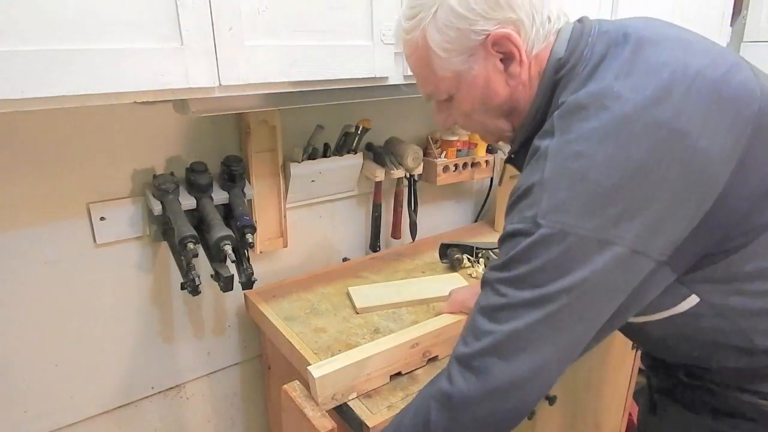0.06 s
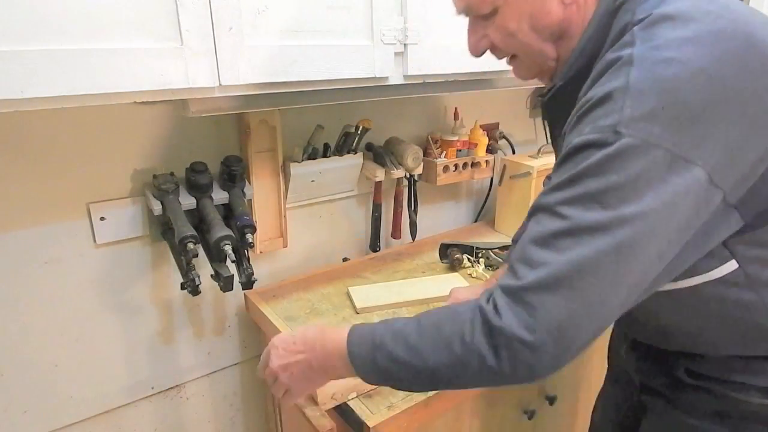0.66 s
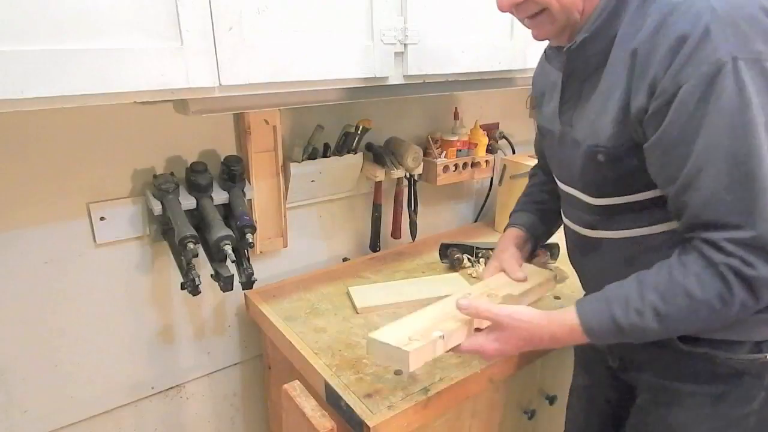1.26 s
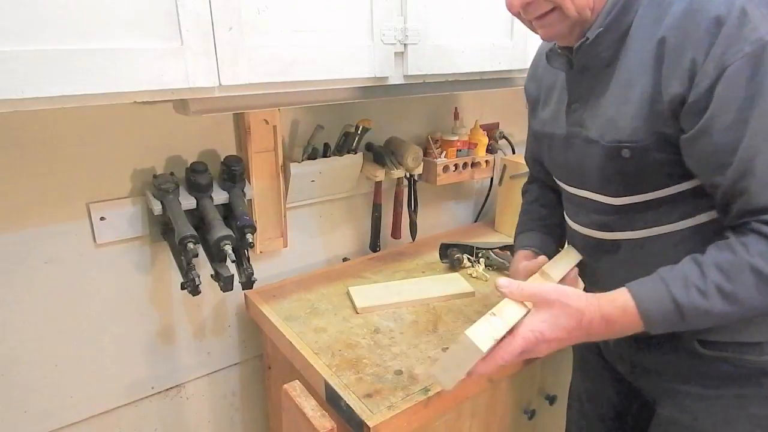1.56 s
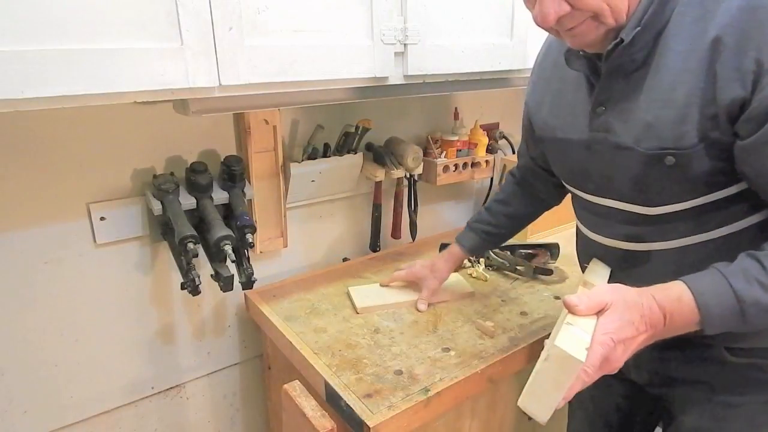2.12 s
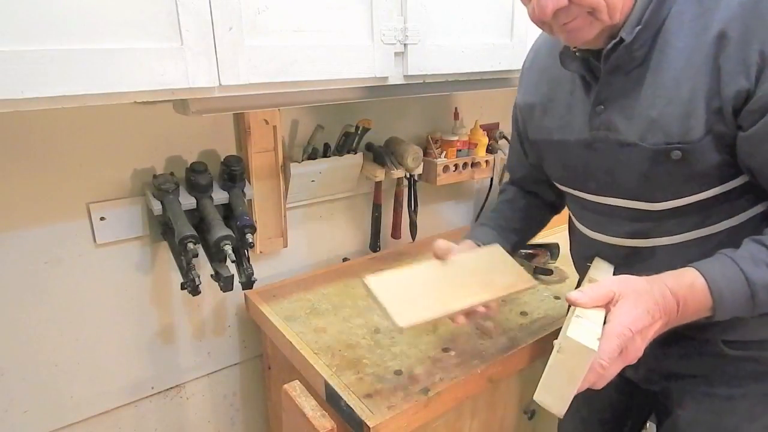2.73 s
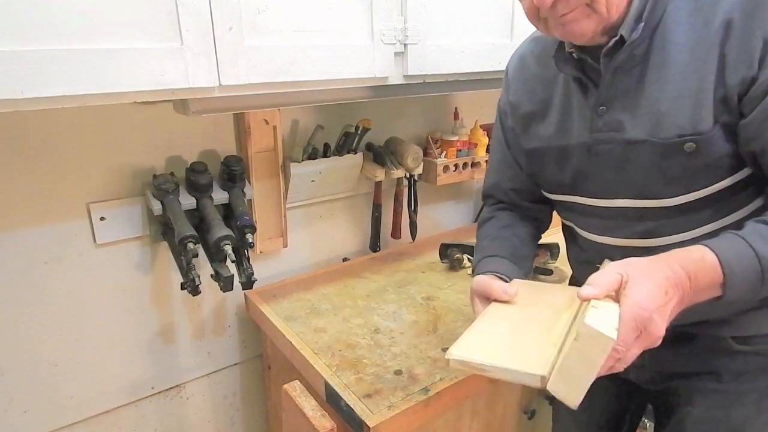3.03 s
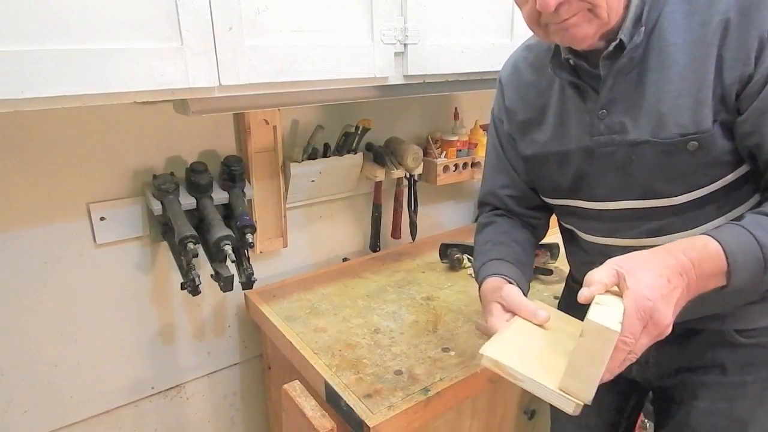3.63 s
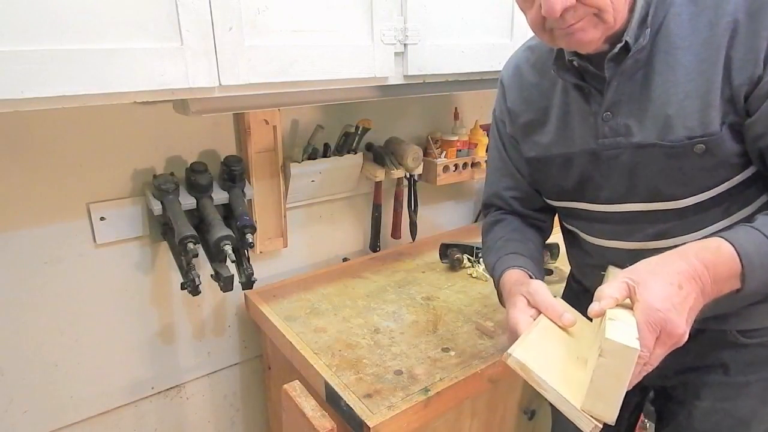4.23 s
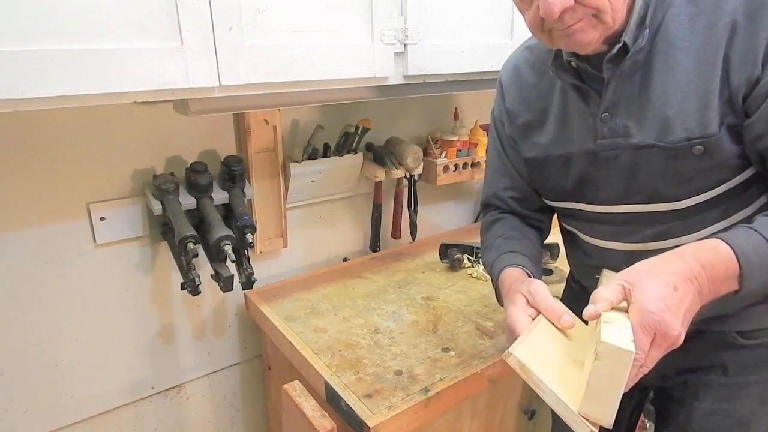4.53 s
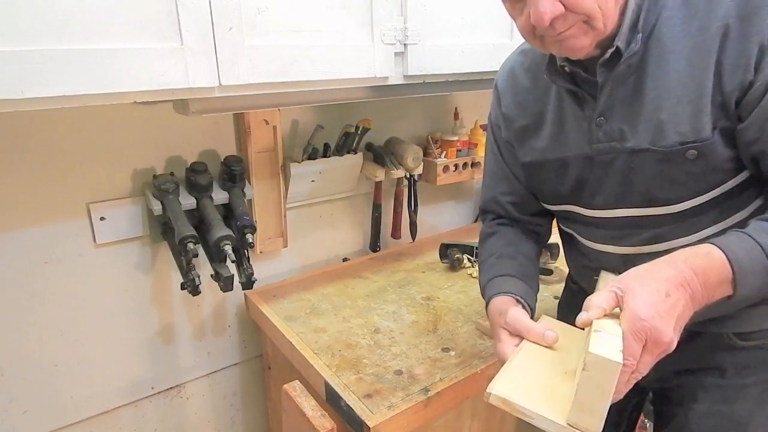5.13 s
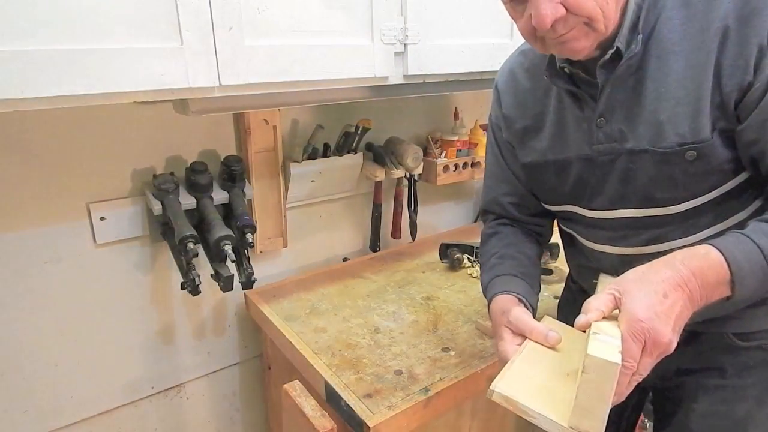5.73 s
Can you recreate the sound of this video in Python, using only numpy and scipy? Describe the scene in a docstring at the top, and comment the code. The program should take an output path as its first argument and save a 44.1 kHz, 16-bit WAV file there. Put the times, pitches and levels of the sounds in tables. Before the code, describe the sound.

In a small workshop, a bench vise is loosened: its screw rumbles while the wooden jaw bumps and groans, and the steel handle gives a bright ringing clink. After a lull, a thin board slides softly off the bench. It is then knocked twice against a hand-held wooden block, about a second apart. Sleeves rustle faintly over a low electrical hum, heard from nearby with a short room echo.

```python
"""A thin board is set against a wooden block and knocked on it four times, two of them loud, ringing both hand-
damped pieces. Before that, the block is freed from a bench vise: the screw rumbles, the jaw knocks and groans,
steel clinks and sings, and the board slides off the bench. Sleeves and hands rustle throughout. A faint mains
hum and the air of a small workshop lie underneath."""
import sys
import numpy as np
from scipy import signal
from scipy.fft import rfft, irfft, next_fast_len
from scipy.io import wavfile
from scipy.ndimage import uniform_filter1d

SR = 44100
rng = np.random.default_rng(int(sys.argv[2]) if len(sys.argv) > 2 else 0)


def generate_wav(signal):
    """Clip the signal to [-1, 1] and save it as 16-bit WAV at the path in sys.argv[1]."""
    frames = np.transpose(np.atleast_2d(signal))
    scaled = np.clip(frames, -1, 1) * 32767
    pcm = np.round(scaled).astype(np.int16)
    wavfile.write(sys.argv[1], SR, pcm)


N = 258867
TIME = np.arange(N) / SR


def from_db(db):
    """Decibels to gain."""
    return 10 ** (np.asarray(db) / 20)


def unit_rms(x):
    """Scale to unit rms."""
    return x / np.sqrt(np.mean(x ** 2) + 1e-20)


def at_hz(curve, hz):
    """Read a curve on a log-frequency axis."""
    freqs, values = np.transpose(curve)
    return np.interp(np.log(np.maximum(hz, 1)), np.log(freqs), values)


def equalise(x, curve):
    """Colour a sound with an EQ curve of (freq_hz, gain_db)."""
    size = next_fast_len(x.shape[-1])
    gain = from_db(at_hz(curve, np.fft.rfftfreq(size, 1 / SR)))
    return irfft(rfft(x, size) * gain, size)[..., :x.shape[-1]]


def low_pass(x, hz):
    """Two-pole low-pass."""
    return signal.sosfilt(signal.butter(2, min(hz, .45 * SR), fs=SR, output="sos"), x)


def resonate(force, modes):
    """Drive parallel resonators of (freq_hz, width_hz, gain_db)."""
    out = 0
    for hz, width_hz, db in modes:
        radius = np.exp(-np.pi * width_hz / SR)
        feedback = [1, -2 * radius * np.cos(2 * np.pi * hz / SR), radius ** 2]
        ring = signal.lfilter([1, 0, -1], feedback, force + 1e-18)
        out = out + from_db(db) * (1 - radius ** 2) / 2 * ring
    return out


def flutter(rate_hz, depth_db):
    """A gain that wanders at random."""
    steps = rng.standard_normal(N)
    return from_db(depth_db * np.interp(TIME * rate_hz, np.arange(N), steps))


def strokes(rows):
    """Envelope of hand strokes: each gathers speed, peaks and runs out ever faster."""
    range_db, fall_curve = 20, 1.67
    t, power = TIME[::32], 0
    for peak_s, db, rise_s, fall_s in rows:
        away = np.where(t < peak_s, ((t - peak_s) / rise_s) ** 2, abs((t - peak_s) / fall_s) ** fall_curve)
        power = power + from_db(db - range_db * np.minimum(away, 10)) ** 2
    return np.interp(TIME, t, np.sqrt(power))


def contact(bright_hz, rattle_s, rattle_db):
    """Force of one touch: a push, then a dying burst of tiny slips; soft touches are dull."""
    t = TIME[:SR // 2]
    slips = rng.standard_normal(len(t)) * np.exp(-t / rattle_s)
    force = from_db(rattle_db) * slips / np.linalg.norm(slips)
    force[0] += 1
    return low_pass(force + 1e-18, bright_hz)


def place(track, start_s, level_db, sound):
    """Lay a sound into a track, with its loudest 20 ms at the given level."""
    at = round(start_s * SR)
    loudest = np.sqrt(uniform_filter1d(sound ** 2, SR // 50, mode="constant").max())
    track[at:at + len(sound)] += (from_db(level_db) / loudest * sound)[:N - at]


# Stereo width of the room: freq_hz, side_over_mid_db
STEREO_WIDTH = [(100, -11), (700, -12), (1300, -8.5), (2500, 0), (5000, -1), (9000, 0.5), (15000, -0.5)]
def diffuse(size):
    """White noise from all around: alike in both channels in the bass, unrelated in the treble."""
    mid, side = rng.standard_normal((2, size))
    mid = equalise(mid, [(hz, -10 * np.log10(1 + from_db(db) ** 2)) for hz, db in STEREO_WIDTH])
    side = equalise(side, [(hz, -10 * np.log10(1 + from_db(-db) ** 2)) for hz, db in STEREO_WIDTH])
    return np.array([mid + side, mid - side])


# Reverb time of the workshop: freq_hz, t60_s
ROOM_DECAY = [(100, 0.38), (400, 0.7143), (1000, 0.73), (2000, 0.78), (5000, 0.5543), (12000, 0.4356)]
def room_tail():
    """Diffuse echo that builds up quickly and dies octave by octave."""
    t, spectrum = TIME[:SR], rfft(diffuse(SR))
    octave = np.log2(np.clip(np.arange(spectrum.shape[1]), 2 ** 6, 2 ** 14))
    tail = 0
    for k in range(6, 15):
        band = irfft(spectrum * np.maximum(1 - abs(octave - k), 0))
        tail = tail + band * from_db(-60 * t / at_hz(ROOM_DECAY, 2 ** k))
    build_up = 1 - np.exp(-t / .0047)
    return unit_rms(tail * build_up) / np.sqrt(SR)


# Early reflections off bench and wall: delay_s, gain_db
EARLY_ECHOES = [(.0032, -13), (.00487, -4), (.0073, -6), (.00914, -11), (.0125, -15)]
def in_room(x, tail, direct_db, room_db, lag_s):
    """Direct sound and early reflections, slightly later on the left, plus the reverb tail."""
    near = x + sum(from_db(db) * np.interp(TIME - s, TIME, x, left=0) for s, db in EARLY_ECHOES)
    pair = np.array([np.interp(TIME - lag_s, TIME, near), near])
    reverb = signal.fftconvolve(x[None], tail, axes=1)[:, :N]
    return from_db(direct_db) * pair + from_db(room_db) * reverb


# Dips in the room tone: start_s, depth_db, hold_s
TONE_DIPS = [(1.325, 12.5, 1.0), (4.25, 8, 0.21)]
def dips(recovery_db_per_s=21.5):
    """Gain that drops at once, holds, and climbs back at a steady rate."""
    db = 0
    for start_s, depth_db, hold_s in TONE_DIPS:
        regained_db = recovery_db_per_s * np.maximum(TIME - start_s - hold_s, 0)
        db = db - (TIME > start_s) * np.maximum(depth_db - regained_db, 0)
    return from_db(uniform_filter1d(db, size=SR // 50))


# Mains hum partials: harmonic, level_db
HUM_PARTIALS = [(1, -65.5), (2, -72.5), (3, -59.5), (4, -60.5), (5, -68.5), (6, -71), (8, -70), (10, -72.5)]
# Dark colour of the room air: freq_hz, gain_db
AIR_EQ = [(12, -6), (30, -3.5), (70, 0), (150, -3), (300, -8), (600, -11.5), (1200, -13.5), (2500, -24.5),
          (6000, -34.5), (15000, -46.5)]
def room_tone(hum_hz=120, air_db=-53.5):
    """A bed of air noise and wavering mains hum that sinks twice and swells back."""
    hum = sum(np.sqrt(2) * from_db(db) * np.sin(2 * np.pi * (hum_hz * harmonic * TIME + rng.random()))
              for harmonic, db in HUM_PARTIALS)
    air = from_db(air_db) * unit_rms(equalise(diffuse(N), AIR_EQ))
    return (air + hum * flutter(rate_hz=3.5, depth_db=2)) * dips()


# Bright colour of rubbed cloth: freq_hz, gain_db
CLOTH_EQ = [(800, -24.5), (1800, -1), (2500, -4), (3000, -3.5), (4100, -2.5), (5200, -9), (8000, -7),
            (11500, -3.5), (13500, -9.5), (15500, -27)]
# Long sweeps and quick flicks of the arms: peak_s, level_db, rise_s, fall_s
SLEEVE_STROKES = [(.11, -51, 0.3, 0.51), (.255, -47, 0.17, 0.24), (.6, -47, 0.15, 0.44),
                  (.8, -49.5, 0.068, 0.28), (.938, -42.5, 0.019, 0.046), (1.015, -40.5, 0.046, 0.13),
                  (1.154, -42, 0.043, 0.058), (1.29, -46.5, 0.11, 0.16), (1.76, -54.5, 0.056, .11),
                  (1.95, -73, 0.075, 0.11), (2.07, -76, .04, .08), (2.21, -70.5, 0.039, 0.054),
                  (2.312, -60.5, .012, 0.14), (2.555, -56.5, 0.12, .09), (2.63, -55, 0.047, 0.061),
                  (2.96, -55.5, 0.22, 1), (3.22, -50, 0.16, 0.51), (3.41, -48, 0.075, 0.16),
                  (3.8, -59, .4, .6), (4.2, -48, 0.046, 0.053), (4.665, -67, 0.12, 0.14),
                  (4.87, -66, 0.11, 0.29), (5.17, -59.5, 0.13, 0.32), (5.62, -66, 0.97, 0.54)]
def sleeve_rustle():
    """Sleeves and hands brush with a fine-grained hiss."""
    hiss = equalise(diffuse(N), CLOTH_EQ) * flutter(rate_hz=660, depth_db=.9)
    return unit_rms(hiss) * strokes(SLEEVE_STROKES)


# Resonances of rubbed wood: freq_hz, width_hz, gain_db
SLIDE_MODES = [(950, 200, -29), (1440, 160, 9.5), (2670, 28, 2.5), (3435, 29, 6.5), (3910, 78, 8),
               (4150, 72, -2), (4400, 283, -6)]
# Sliding moves: peak_s, level_db, rise_s, fall_s
SLIDE_STROKES = [(.25, -43.5, 0.1, 0.097), (.46, -50.5, .03, 0.06), (.63, -56, .06, 0.064),
                 (1.025, -37.5, 0.038, 0.044), (2.32, -79, .02, .06), (2.54, -44.5, 0.022, 0.07),
                 (2.632, -52, .025, 0.15), (2.93, -53.5, .03, 0.091), (3.01, -52, 0.061, 0.4),
                 (3.18, -52, 0.24, 0.23), (3.44, -43, 0.027, 0.07), (3.508, -47.5, 0.018, 0.035),
                 (4.01, -72, 0.02, 0.19)]
def wood_slide():
    """Wood slides on wood or under the fingers; uneven friction excites its modes."""
    friction = diffuse(N) * flutter(rate_hz=370, depth_db=4.5)
    return unit_rms(resonate(friction, SLIDE_MODES)) * strokes(SLIDE_STROKES)


# Low resonances of the bench frame: freq_hz, width_hz, gain_db
FRAME_MODES = [(77.4, 26, -6.5), (101.3, 8.1, 8.5), (141, 21, -17), (220, 200, 0), (364, 220, -10),
               (635, 33, -10), (920, 470, -12)]
# Turns of the screw and drags on the bench: peak_s, level_db, rise_s, fall_s
RUMBLE_STROKES = [(.06, -49, 0.044, .5), (.24, -41, 0.024, 0.28), (.51, -42.5, 0.18, 0.39),
                  (.68, -36.5, 0.2, 0.6), (1.05, -36.5, 0.12, 0.58), (1.3, -38, 0.054, 0.31),
                  (2.32, -59.5, 0.056, 0.24), (2.52, -47, 0.023, 0.36), (2.68, -49, 0.11, .2)]
def screw_rumble():
    """The turning vise screw and dragging wood shake the bench frame."""
    friction = diffuse(N) * flutter(rate_hz=40, depth_db=2.5)
    rumble = low_pass(resonate(friction, FRAME_MODES), hz=1100)
    return unit_rms(rumble) * strokes(RUMBLE_STROKES)


# Short, low groans: peak_s, level_db, pitch_hz, fade_s (in and out)
JAW_GROANS = [(.25, -39, 190, 0.054), (.445, -38, 194.4, 0.043), (0.522, -31.5, 100, 0.037),
              (.603, -33, 141, 0.012), (0.726, -33, 340, 0.081), (1.2, -32.5, 276, 0.048)]
def jaw_groans(sag_oct_per_s=.6):
    """The wooden jaw sticks and slips: a rough tone whose pitch sags as the jaw slows."""
    out = 0
    for peak_s, db, pitch_hz, fade_s in JAW_GROANS:
        glide_hz = pitch_hz * 2 ** (-sag_oct_per_s * np.clip(TIME - peak_s, -.2, .2))
        tone = np.sqrt(2) * np.sin(2 * np.pi * np.cumsum(glide_hz) / SR)
        out = out + tone * strokes([(peak_s, db, fade_s, fade_s)])
    return out * flutter(rate_hz=160, depth_db=3)


# Steel parts of the vise touch: start_s, ring_db, tick_db, bright_hz
STEEL_HITS = [(1.137, -44.5, -59.5, 6880), (1.158, -51.5, -45.5, 11950), (1.305, -23, -25.5, 14000),
              (1.392, -37.5, -51, 14040)]
def steel_ticks():
    """The sharp, dry attack of steel meeting steel."""
    out = np.zeros(N)
    tick_modes = [(3400, 280, .96), (6240, 710, -1), (10500, 5400, 0)]
    for start_s, _, tick_db, bright_hz in STEEL_HITS:
        force = contact(bright_hz, rattle_s=.003, rattle_db=11.5)
        place(out, start_s, tick_db, resonate(force, tick_modes))
    return out


# Modes of the steel bar, with two beating pairs: freq_hz, gain_db, t60_s
BAR_MODES = [(3092, -13, .28), (6052, -13, .6), (6066, -15, .6), (9765, 0, .38), (9794, 3, .46),
             (10281, 0, .35), (14278, -7, .6)]
# Steel slides on steel: peak_s, level_db, rise_s, fall_s
SQUEAL_STROKES = [(1.145, -42.5, .03, .13), (1.285, -38, 0.082, .1)]
def steel_ring(squeal_db_per_oct=-14.5):
    """Struck, the steel bar rings in high, slowly dying modes; rubbed, it sings mostly on the lowest."""
    struck, t = np.zeros(N), TIME[:SR]
    ring = sum(from_db(db - 60 * t / t60) * np.sin(2 * np.pi * hz * t) for hz, db, t60 in BAR_MODES)
    for start_s, ring_db, _, bright_hz in STEEL_HITS:
        place(struck, start_s, ring_db, low_pass(ring, bright_hz))
    lowest_hz = BAR_MODES[0][0]
    squeal = sum(from_db(squeal_db_per_oct * np.log2(hz / lowest_hz)) * np.sin(2 * np.pi * hz * TIME)
                 for hz, _, _ in BAR_MODES)
    jiggle = flutter(rate_hz=90, depth_db=4)  # the bar sits loose
    return (struck + squeal * strokes(SQUEAL_STROKES)) * jiggle


# Body of the bench with its vise: freq_hz, width_hz, gain_db
BENCH_MODES = [(110, 78, -5.5), (212, 54, 0), (258.6, 45, -18), (351.6, 32, -2), (481.5, 31, 5),
               (597, 80, 7), (743, 190, 5), (920, 120, 4), (1080, 140, -5), (1262, 89, 1), (1650, 99, -33),
               (2000, 320, -9.5), (3083, 460, 0.5), (6350, 1327, -25.5)]
# Bumps on vise and bench: start_s, level_db, bright_hz, rattle_s
BENCH_HITS = [(.033, -51, 990, 0.03), (.198, -22, 1190, 0.012), (0.237, -36, 895, .014),
              (.275, -27, 1300, 0.014), (.428, -39, 403, .03), (.455, -34, 1020, 0.017),
              (.498, -44.5, 789, .02), (.657, -27, 880, 0.025), (.675, -37, 677, 0.072),
              (.9855, -34, 1970, 0.00023), (1.012, -39.5, 3240, 0.024), (1.136, -29, 1130, 0.018),
              (1.245, -32.5, 685, 0.1), (1.3039, -25, 3350, .003), (2.306, -48.5, 130, .025),
              (2.51, -49.5, 1390, 0.009), (2.525, -48.5, 1750, 0.038), (2.63, -49.5, 1500, 0.031)]
def bench_knocks():
    """The loose vise jaw and the wood bump the heavy bench; each spot favours other modes."""
    out = np.zeros(N)
    for start_s, level_db, bright_hz, rattle_s in BENCH_HITS:
        modes = [(hz, width_hz, db + 3.5 * rng.standard_normal()) for hz, width_hz, db in BENCH_MODES]
        force = contact(bright_hz, rattle_s, rattle_db=13)
        cushioned = low_pass(force, 1.39 * bright_hz)  # broad wooden faces soften the blow
        place(out, start_s, level_db, resonate(cushioned, modes))
    return out


# Hand-damped board and block, their faces clapping, the grip's thud: freq_hz, width_hz, gain_db
BOARD_MODES = [(800, 4.1, 3.5), (850, 25, -5.5), (862, 21, -4), (1356, 42, -31.5), (1917, 71, -14),
               (2100, 9.1, -8.5)]
BLOCK_MODES = [(598.6, 29, -1), (944, 35, -16.5), (1496, 17, 2.5), (2615, 150, -11), (3372, 110, -9),
               (3970, 170, -20)]
CLAP_MODES = [(679, 36, -3.5), (760, 70, -3), (995, 260, -1), (1086, 31, -2), (1289, 43, -2),
              (1422, 103, 3.5), (1470, 11, -6), (1900, 260, -14.5), (3140, 700, -25.5), (6500, 9900, -15.5),
              (9700, 2100, -1)]
THUD_MODES = [(142, 60, -3), (243, 7, 0.5), (321, 125, 7.5), (363, 36, -7.5), (493, 52, 8), (718, 16, -3.5)]
# Board meets block: start_s, board_db, block_db, clap_db, thud_db, bright_hz, rattle_s
BOARD_HITS = [(3.219, -62.5, -31, -63, -24, 4130, 0.023), (3.2988, -10, -23.5, -15, -21.5, 1670, 0.0065),
              (3.939, -48, -32, -36, -39.5, 1560, .0009), (4.2093, -26.5, -25, -13.5, -27.5, 4290, 0.0016)]
def board_knocks():
    """One contact drives both pieces and the hands; where it lands decides which rings most."""
    out = np.zeros(N)
    for start_s, *levels_db, bright_hz, rattle_s in BOARD_HITS:
        force = low_pass(contact(bright_hz, rattle_s, rattle_db=-8), bright_hz)
        for modes, db in zip((BOARD_MODES, BLOCK_MODES, CLAP_MODES, THUD_MODES), levels_db):
            place(out, start_s, db, resonate(force, modes))
    return out


def scene():
    """Knocks and steel with reverb, over room tone and rubbing; the mix leans a little to the right."""
    tail = room_tail()
    bench = in_room(bench_knocks(), tail, direct_db=1, room_db=-2, lag_s=15e-6)
    ticks = in_room(steel_ticks(), tail, direct_db=-.5, room_db=-10.5, lag_s=40e-6)
    rings = in_room(steel_ring(), tail, direct_db=-.5, room_db=-19, lag_s=30e-6)
    board = in_room(board_knocks(), tail, direct_db=-4.5, room_db=-7.5, lag_s=30e-6)
    bed = room_tone()
    rubbing = screw_rumble() + wood_slide() + sleeve_rustle() + jaw_groans()
    balance = from_db([[-1], [.9]])
    return (bed + rubbing + ticks + rings + bench + board) * balance


def record(dry):
    """Soft-clip the highest peaks and cut the extreme treble."""
    ceiling, cutoff_hz = 1.15, 15700
    rounded = ceiling * np.tanh(dry / ceiling)
    return signal.sosfilt(signal.ellip(10, .1, 80, cutoff_hz, fs=SR, output="sos"), rounded)


dry = scene()
out = record(dry)
generate_wav(out)
```